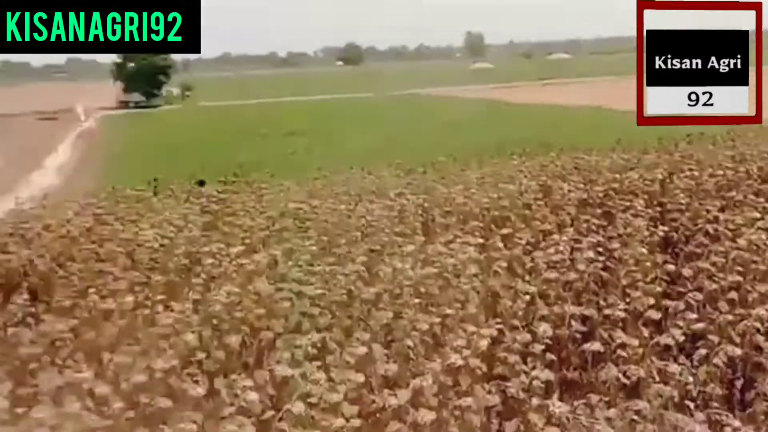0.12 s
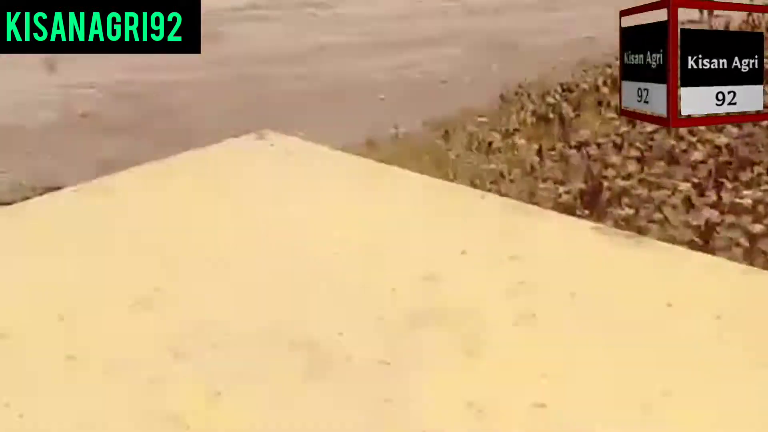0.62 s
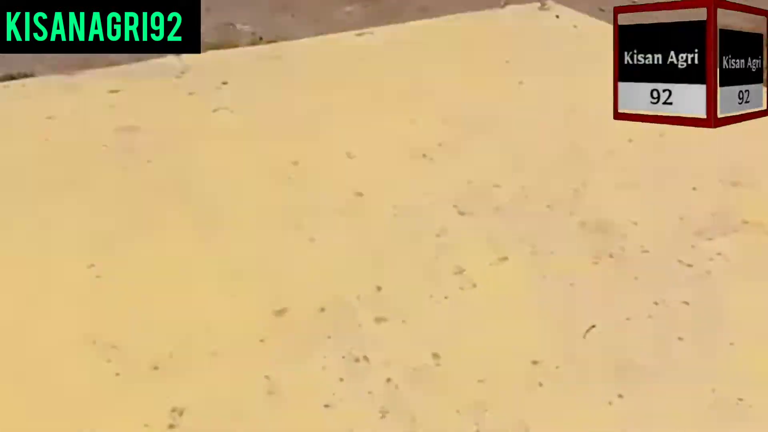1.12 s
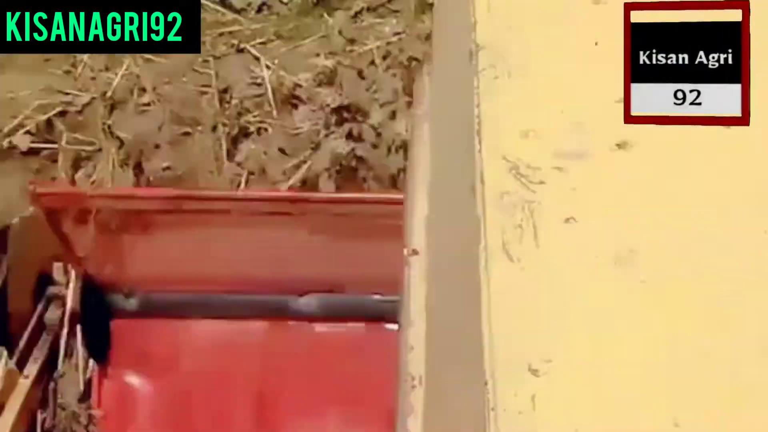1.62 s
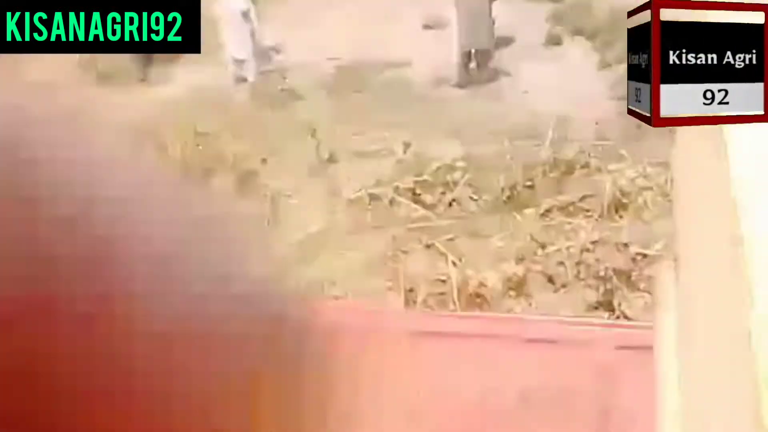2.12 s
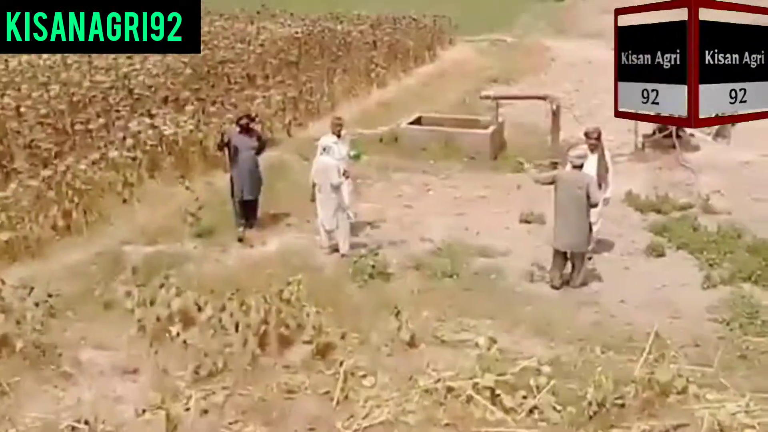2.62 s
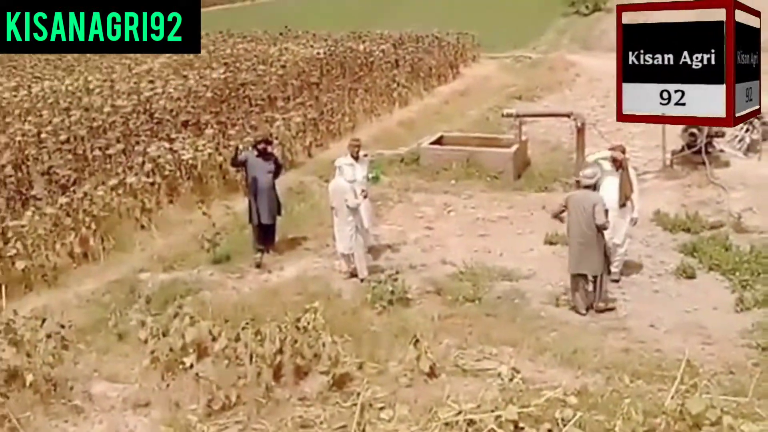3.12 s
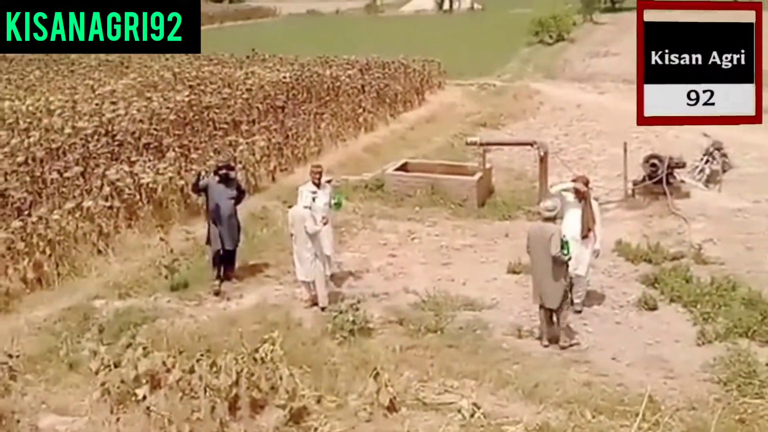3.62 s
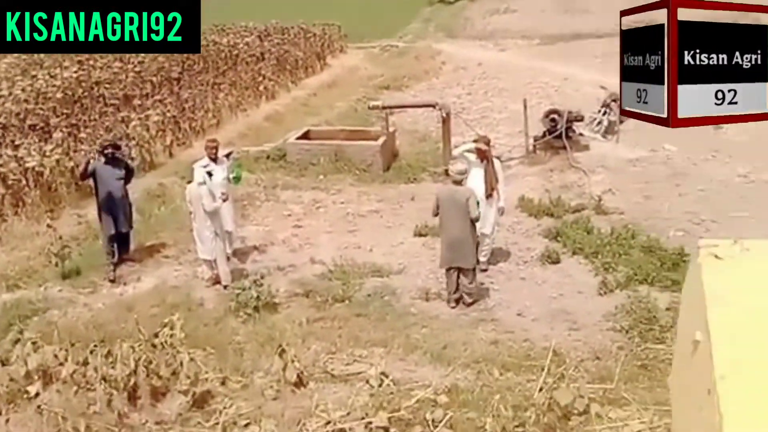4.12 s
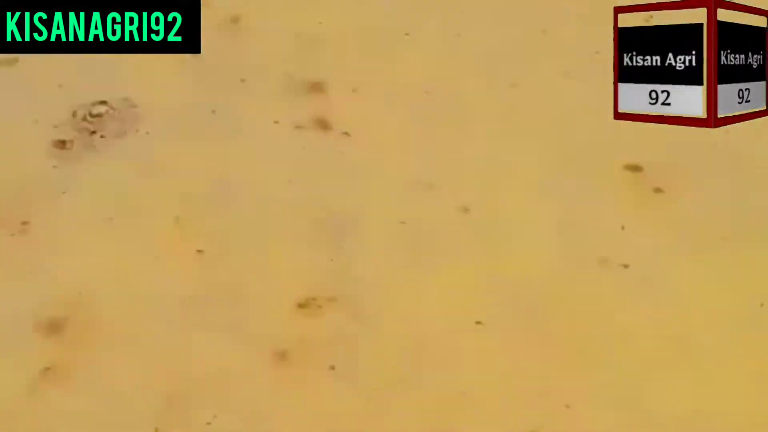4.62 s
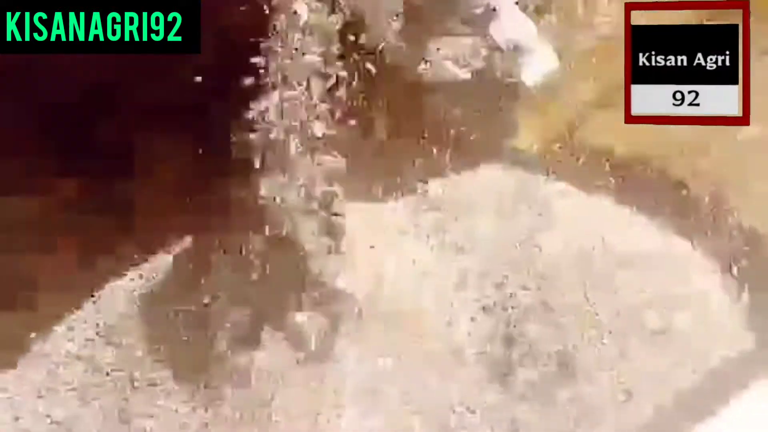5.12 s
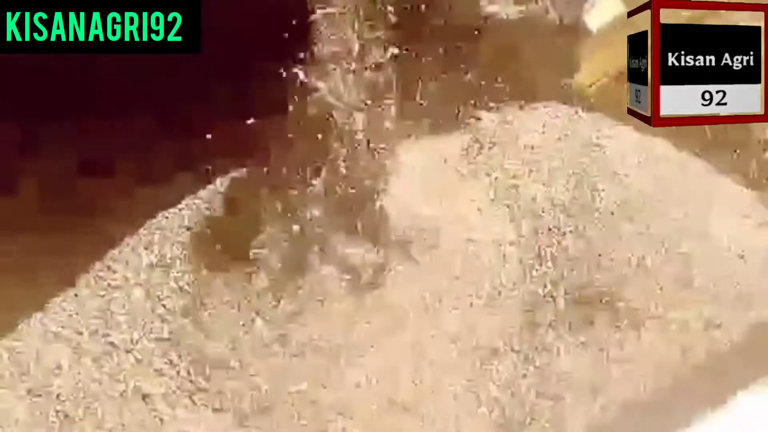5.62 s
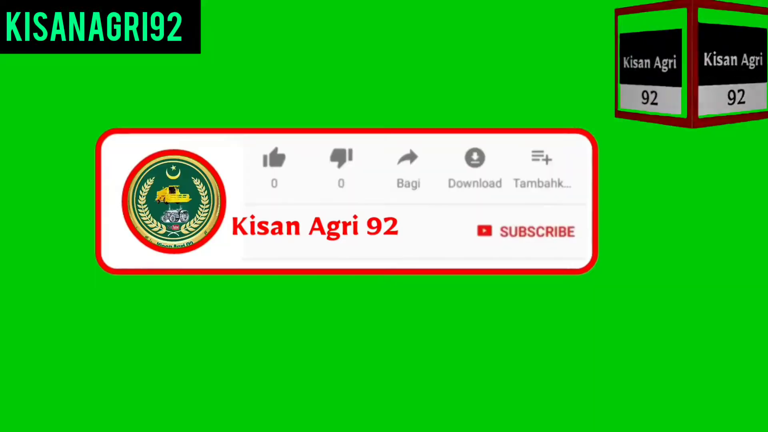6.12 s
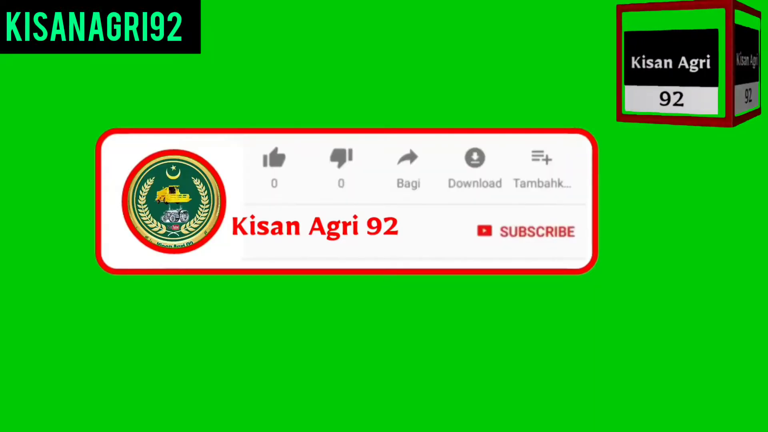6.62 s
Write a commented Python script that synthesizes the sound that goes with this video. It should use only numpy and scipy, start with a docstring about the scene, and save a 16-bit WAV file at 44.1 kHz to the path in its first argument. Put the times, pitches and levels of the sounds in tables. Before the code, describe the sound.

Continuous harvester machinery, close and rough: broadband roar, steady low engine hum and a rapid, irregular metallic chatter with some harder clacks. A hand-held microphone on top swings over the roof edge to the header, outward to the field, then into the grain tank, where the knocks sink back and the drone and hollow resonance come forward. Sudden silence ends it at six seconds.

```python
"""A roar of threshing and fans, with a chain knocking its slats on sheet metal 27 times a second, over a droning diesel:
a combine harvester at work, heard from its roof by a hand-held microphone that turns as the machine runs.
Roar is noise, knocks are bursts that ring the panel's modes, the diesel is three tones; after some knocks the sheet
metal rings on faintly at a gliding pitch. The microphone faces the roof, then over its edge the header, the open
field and the grain tank, where noise rings in the hollow; the sound stops dead."""
import sys
import numpy as np
from scipy import signal
from scipy.fft import rfft, irfft, next_fast_len
from scipy.io import wavfile

SR = 44100
rng = np.random.default_rng(int(sys.argv[2]) if len(sys.argv) > 2 else 0)


def output_pcm(signal):
    """Save a mono or channel-first signal as 16-bit PCM at the path in sys.argv[1].

    Samples are clipped to [-1, 1] before scaling.
    """
    pcm = np.clip(np.atleast_2d(signal).T, -1, 1) * 32767
    wavfile.write(sys.argv[1], SR, np.round(pcm).astype(np.int16))


def invert_db(level):
    """Linear amplitude ratio for a level in decibels (20 dB per decade), elementwise."""
    return 10 ** (np.asarray(level, dtype=float) / 20)


N = 298110
STOP_S = 6.0482   # the sound stops dead here
RISE_S, FALL_S = 0.0049, .007   # time constants of a knock's power


def at_hz(points, hz):
    """A spectrum read on a log-frequency axis."""
    points_hz, points_db = np.transpose(points)
    return np.interp(np.log(hz), np.log(points_hz), points_db)


def rms_one(x):
    """Scaled to rms 1."""
    return x / np.sqrt(np.mean(x ** 2) + 1e-20)


def drift(rate_hz):
    """Slow chance of spread 1: noise at every 40th sample, low-passed twice."""
    pole = np.exp(-2 * np.pi * rate_hz * 40 / SR)
    noise = rng.standard_normal(N // 40 + 2002)
    slow = signal.lfilter([1], [1, -2 * pole, pole * pole], noise)[2000:]   # the filter has settled
    return np.interp(np.arange(N) / 40, np.arange(len(slow)), rms_one(slow))


def resonate(x, hz, width_hz):
    """Two-pole resonance with gain 1 on top."""
    r = np.exp(-np.pi * width_hz / SR)
    poles = [1, -2 * r * np.cos(2 * np.pi * hz / SR), r * r]
    return signal.lfilter([(1 - r * r) / 2, 0, (r * r - 1) / 2], poles, x + 1e-18)


def burst(at, db, rise_s, fall_s):
    """Power envelope of knocks: each swells and dies in a few milliseconds, as a slat rattles home."""
    blows = np.full(N, 1e-18)
    blows[at] = invert_db(db) ** 2
    rise, fall = np.exp(-1 / (rise_s * SR)), np.exp(-1 / (fall_s * SR))
    return signal.lfilter([1 - rise], [1, -rise - fall, rise * fall], blows)


# How far the knocks stand out of the roar.
# Each row: frequency in Hz, gain on the knock's strength in dB.
KNOCK_SPECTRUM = [(100, -31.5), (300, -17.5), (1000, -12.5), (2500, -6.5), (4000, -3.5), (6500, 2.5),
                  (10000, 2.5), (15000, 2)]


def machinery(at, strength_db, tilt_db, patchy_db):
    """Threshing and fans: flat noise in third-octave bands that flicker; every knock adds a short burst."""
    out = 0
    together = drift(9.0)   # flicker shared by all bands
    edges = 20 * 2 ** (np.arange(30) / 3)
    white = rng.standard_normal((2, N))   # neighbouring bands take different noise
    chance = rng.standard_normal((len(at), len(edges)))
    for k, (low, high) in enumerate(zip(edges, edges[1:])):
        band = signal.sosfilt(signal.butter(2, [low, high], "band", fs=SR, output="sos"), white[k % 2])
        hz = np.sqrt(low * high)
        tilted_db = tilt_db * np.log2(max(hz, 2000) / 6000)
        blow_db = strength_db + at_hz(KNOCK_SPECTRUM, hz) + tilted_db + 1.5 * chance[:, k]
        flicker_db = at_hz(patchy_db, hz) * (0.66 * together + drift(20.0))
        power = invert_db(flicker_db) ** 2 + burst(at, blow_db, RISE_S, FALL_S)
        out = out + band * np.sqrt(power)
    return out


# Slat knocks placed one by one, each with its own strength and pitch.
# Each row: onset in seconds, strength before colouring in dB over the roar, favoured pitch in Hz.
PLACED_KNOCKS = [(0.253, 5, 6080), (.325, 6, 4210), (.4056, 7.5, 3210), (0.472, 8, 3140), (.556, 6, 6050),
                 (.6265, 2, 6100), (.7038, 5, 3410), (0.844, 5.5, 5440), (1.028, 8, 3290), (1.212, 9, 4250),
                 (1.3713, 4.5, 5200), (1.522, 7.5, 5490), (1.624, 6.5, 5380), (1.7419, 4, 4420),
                 (1.919, 9, 3240), (2.027, 11, 6250), (2.1181, 4, 3090), (2.297, 8.5, 3180),
                 (2.587, 6.5, 6130), (2.7636, 8, 3320), (3.093, 9, 5000), (3.168, 6, 4190),
                 (3.5473, 8, 4000), (3.739, 7.5, 4400), (3.8382, 6, 6770), (3.9529, 4.5, 6680),
                 (4.017, 7.5, 6240), (4.0911, 7, 6230), (4.1375, 3.5, 9900), (4.1624, 6.5, 6300),
                 (4.2106, 6, 6270), (4.25, 4.5, 9800), (4.324, 4, 9900), (4.3914, 6.5, 6260),
                 (4.5097, 9, 4190)]
# Knocks sound duller over the roof, brighter towards the field.
# One value for each direction, roof to tank: tilt in dB per octave.
DIRECTION_TILT = [-2, -1.5, 0.3, 0.9, 0.8]


def slats(direction, beat_db):
    """Chain slats landing: sample, strength, favoured pitch and tilt of an uneven beat and of the placed knocks."""
    chain_hz, chain_start_s = 27.1, .002
    jitter_s, spread_db, tilt_spread_db = .003, 1.5, 1.33   # slats land unevenly; tilt per octave
    every_other_db = 1.3   # alternate slats are this much harder or softer
    beat_s = np.arange(chain_start_s, STOP_S, 1 / chain_hz)
    chance = rng.standard_normal((len(beat_s), 4))
    placed_s, placed_db, placed_hz = np.transpose(PLACED_KNOCKS)
    # a placed knock takes the place of the beats close to it
    free = abs(beat_s[:, None] - placed_s).min(axis=1) > .4 / chain_hz
    beat = np.clip((beat_s + jitter_s * chance[:, 0]) * SR, 0, N - 1).astype(int)
    placed = ((placed_s - .0015) * SR).astype(int)   # the rattle swells from just before its onset is heard
    alternate_db = every_other_db * (-1.) ** np.arange(len(beat))
    free_db = beat_db[beat] - alternate_db + spread_db * chance[:, 1]
    free_hz = 5200 * 2 ** (.4 * chance[:, 2])
    at = np.r_[beat[free], placed]
    strength_db = np.r_[free_db[free], placed_db]
    favoured_hz = np.r_[free_hz[free], placed_hz]
    tilt_db = np.r_[tilt_spread_db * chance[free, 3], 0 * placed_s]
    tilt_db = tilt_db + np.interp(direction[at], np.arange(5), DIRECTION_TILT)
    return at, strength_db, favoured_hz, tilt_db


# Modes of the sheet metal that the slats strike.
# Each row: frequency in Hz, relative level in dB, time to ring down by 60 dB in seconds.
PANEL_MODES = [(2340, -7, .018), (3210, -7, 0.02), (3370, -4, 0.02), (4150, -3, 0.026), (4420, -3, 0.016),
               (5000, -5, .018), (5500, -2, .018), (6020, 0, .016), (6270, 2, 0.023), (6710, 0.5, 0.019),
               (8760, -5, 0.023), (10080, 5.5, .012), (12080, -1, .015), (15100, -4.5, .012)]


def panel(at, strength_db, favoured_hz, tilt_db, level_db, favour_db):
    """The rattle of each knock excites every mode of the sheet metal, favouring those near its favoured pitch."""
    out = 0
    chance = rng.standard_normal((len(at), len(PANEL_MODES)))
    rattle = rng.standard_normal(N)
    for k, (hz, mode_db, t60) in enumerate(PANEL_MODES):
        near = np.exp(-(np.log2(hz / favoured_hz) / .12) ** 2)
        blow_db = strength_db + mode_db + level_db + favour_db * near
        blow_db = blow_db + tilt_db * np.log2(hz / 6000) + 3.1 * chance[:, k]
        shake = np.sqrt(burst(at, blow_db, RISE_S, fall_s=0.003))
        out = out + resonate(rattle * shake, hz, width_hz=np.log(1000) / (np.pi * t60))
    return out


# The turning microphone, held by hand on the roof.
# Each row: time in seconds, direction (0 roof, 1 roof edge, 2 header, 3 field, 4 tank), gain on the roar in dB.
MICROPHONE_TURN = [(0, 0.01, -3), (.5, 0.044, -5), (.85, .13, -3), (1.05, 0.4, -2.5), (1.5, 0.99, -2.24),
                   (1.75, 1.64, 0.1), (2.1, 2.17, 1), (2.16, 2.85, -3), (2.5, 2.98, -3), (3.3, 2.92, -3.1),
                   (4.0, 3.1, -3.5), (4.31, 3.25, -3), (4.36, 3.56, -2), (4.58, 3.25, -2.5),
                   (4.66, 3.49, -2.5), (4.9, 3.94, -0.8), (6.05, 3.95, -.5)]


def turning():
    """Where the hand points the microphone and the gain on the roar there, one value per sample."""
    s, direction, roar_db = np.transpose(MICROPHONE_TURN)
    t = np.arange(N) / SR
    return np.clip(np.interp(t, s, direction), 0, 4), np.interp(t, s, roar_db)


# Shape of the roar's spectrum facing the roof, its edge, the header, the field and the tank.
# Each row: frequency in Hz, relative density in dB per Hz.
ROOF_SPECTRUM = [(45, -9), (80, 1), (140, 3), (260, -0.5), (500, -3.5), (900, -9), (1500, -13), (2600, -13),
                 (3400, -13), (5000, -17), (6200, -16), (8100, -37.5), (10000, -36), (13500, -43)]
EDGE_SPECTRUM = [(45, -6), (140, 1.5), (300, -2.5), (500, -8.5), (900, -12), (1600, -17), (2400, -13),
                 (3300, -10.5), (3900, -16), (5500, -11.5), (6400, -17), (8100, -37.5), (10000, -35),
                 (13500, -43)]
HEADER_SPECTRUM = [(45, -12.5), (80, -0.5), (150, 3), (300, -0.5), (450, -5), (900, -11.5), (1500, -16.5),
                   (2300, -10.5), (3200, -11.5), (4400, -10.5), (6200, -19), (8100, -28.5), (10000, -32),
                   (13500, -38.5)]
FIELD_SPECTRUM = [(45, -8.5), (80, 3), (150, 3), (300, -1), (460, -2), (740, -11.5), (900, -8),
                  (1700, -16.5), (2200, -15), (2700, -14.5), (3300, -17), (4200, -17.5), (4700, -21),
                  (6500, -22), (8200, -31), (9900, -30.5), (11000, -34.5), (12000, -34.5), (13500, -38.5)]
TANK_SPECTRUM = [(45, -8.5), (80, -1.5), (150, -0.5), (280, -0.5), (430, -7.5), (720, -6.5), (1000, -15),
                 (1400, -15.5), (2200, -18), (2900, -20.5), (3900, -17.5), (5300, -28.5), (6400, -25.5),
                 (8200, -37.5), (10500, -37), (13500, -43)]
# Treble gain of those shapes, which sets the level of each whole spectrum.
# One value for each direction: rms from 4.5 to 13.5 kHz for white noise of rms 1, in dB.
TREBLE_LEVEL = [-31, -29, -34, -34.5, -40.5]


def facing(source, direction):
    """The same machine coloured five ways, faded from one to the next as the microphone turns."""
    size = next_fast_len(N)
    hz = np.maximum(np.fft.rfftfreq(size, 1 / SR), 1)
    spectrum, out = rfft(source, size), 0
    treble = (hz > 4500) & (hz < 13500)
    colours = [ROOF_SPECTRUM, EDGE_SPECTRUM, HEADER_SPECTRUM, FIELD_SPECTRUM, TANK_SPECTRUM]
    for k, colour in enumerate(colours):
        gain = invert_db(at_hz(colour, hz))
        gain *= invert_db(TREBLE_LEVEL[k]) / np.sqrt(np.sum(gain[treble] ** 2) / len(hz))
        share = np.clip(1 - abs(direction - k), 0, 1)
        out = out + share * irfft(spectrum * gain, size)[:N]
    return out


def rim_shade(x):
    """While the microphone passes behind the tank's rim, a share of the highest treble is lost."""
    start_s, end_s, shade_hz, share = 4.33, 4.6, 10600, 0.36
    corners_s = [start_s, start_s + .015, end_s, end_s + 0.098]
    behind = np.interp(np.arange(N) / SR, corners_s, [0, 1, 1, 0])
    top = signal.sosfiltfilt(signal.butter(4, shade_hz, "high", fs=SR, output="sos"), x)
    return x - share * behind * top


# What else changes with the direction the microphone faces.
# Each row: direction (0 roof to 4 tank), strength of the chain's beat in dB over the roar, firing tone,
# second and third order in dB, spread of their wavering in dB (a minus sign turns the swells over).
BEAT_AND_ENGINE = [(0, 1, -30, -33, -44, 3), (1, 4, -32.5, -37, -44.5, -2.4), (2, 5.5, -33, -38, -45.5, 2),
                   (3, 4.5, -31, -33.5, -41, 1.5), (3.5, -0.5, -27.5, -33, -41.5, -1),
                   (4, -3.5, -25.5, -29.5, -36, 1)]


def heard(direction):
    """Chain beat, three engine orders and wavering at the microphone, one value per sample."""
    faces, *columns = np.transpose(BEAT_AND_ENGINE)
    return [np.interp(direction, faces, column) for column in columns]


def engine(orders_db, waver_db):
    """Firing tone and two overtones; speed wanders a little, and each tone swells and fades slowly by chance."""
    firing_hz, wander_hz = 106.1, .5
    phase = 2 * np.pi * np.cumsum(firing_hz + wander_hz * drift(2.09)) / SR
    out = 0
    for order, db in enumerate(orders_db, start=1):
        level = np.sqrt(2) * invert_db(db + waver_db * drift(3.9))
        out = out + level * np.sin(order * phase + 0.23 * drift(2.8))
    return out


# After some knocks the sheet metal rings on faintly at a gliding pitch.
# Each row: start in seconds, length in seconds, start pitch in Hz, end pitch in Hz, relative level in dB.
GLIDING_RINGS = [(.235, .05, 4380, 4100, -33), (0.308, 0.0388, 4350, 4130, -35),
                 (.40, .095, 3235, 3270, -36), (1.93, .075, 4250, 4750, -31.5)]


def gliding_rings():
    """Sheet metal ringing on: a gliding tone, roughened by slow noise, swells and fades."""
    width_hz, roughness = 60, .5
    out, t = 0, np.arange(N) / SR
    rough = rms_one(resonate(rng.standard_normal(N), width_hz / 2, width_hz))
    for s, length, start_hz, end_hz, db in GLIDING_RINGS:
        done = np.clip((t - s) / length, 0, 1)
        phase = 2 * np.pi * np.cumsum(start_hz + (end_hz - start_hz) * done) / SR
        out = out + 2 * invert_db(db) * np.sin(np.pi * done) * np.sin(phase)
    return out * (1 - roughness + roughness * rough)


# Air ringing in the grain tank.
# Each row: frequency in Hz, width of each of two resonances in Hz, relative level in dB.
TANK_RESONANCES = [(700, 150, -41), (1267, 74, -45), (1894, 49, -46), (2520, 330, -40)]


def tank_air(direction):
    """Noise ringing in the hollow of the tank, heard when the microphone looks in."""
    noise = rng.standard_normal(N)
    ringing = 0
    for hz, width_hz, db in TANK_RESONANCES:
        twice = resonate(resonate(noise, hz, width_hz), hz, width_hz)
        ringing = ringing + invert_db(db) * rms_one(twice)
    return np.clip(direction - 3, 0, 1) * ringing


def scene():
    """Roar, knocks, engine, gliding rings and tank at the turning microphone."""
    direction, roar_db = turning()
    beat_db, *orders_db, waver_db = heard(direction)
    at, strength_db, favoured_hz, tilt_db = slats(direction, beat_db)
    # flicker of the roar: (Hz, dB)
    patchy_db = [(100, 0.21), (600, 1.22), (3000, 1.01), (12000, 1.2)]
    roar = machinery(at, strength_db, tilt_db, patchy_db)
    source = roar + panel(at, strength_db, favoured_hz, tilt_db, level_db=3.0, favour_db=9)
    machine = invert_db(roar_db) * rim_shade(facing(source, direction))
    mix = machine + engine(orders_db, waver_db) + gliding_rings() + tank_air(direction)
    return mix[None]


def low_pass(x):
    """Removes everything above the highest recorded frequency."""
    return signal.sosfilt(signal.butter(12, 16880, fs=SR, output="sos"), x)


def record(dry):
    """The microphone's port rings, both ends are cut, a regular ripple of 43 Hz runs through the level,
    peaks are rounded and the sound stops."""
    port_hz, port_width_hz, port_db = 15200, 1150, 14
    bass_cut_hz, treble_cut_hz = 40, 15560
    ripple_hz, ripple_top_s, ripple_db = 43.066, .008, 1.21   # the level swings this far up and down
    ring = resonate(resonate(dry, port_hz, port_width_hz), port_hz, port_width_hz)
    port = dry + invert_db(port_db) * ring
    thin = signal.sosfilt(signal.butter(2, bass_cut_hz, "high", fs=SR, output="sos"), port)
    dull = signal.sosfilt(signal.ellip(12, .5, 60, treble_cut_hz, fs=SR, output="sos"), thin)
    t = np.arange(N) / SR
    ripple = invert_db(ripple_db * np.cos(2 * np.pi * ripple_hz * (t - ripple_top_s)))
    rounded = 0.46 * np.tanh(dull * ripple / 0.44)
    running = np.clip((STOP_S - t) / .0005, 0, 1)
    return low_pass(rounded * running)


dry = scene()
out = record(dry)
output_pcm(out)
```